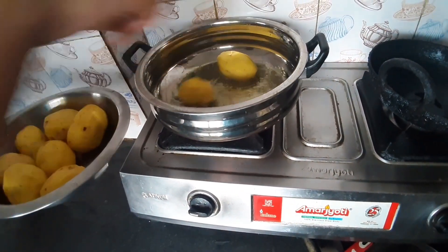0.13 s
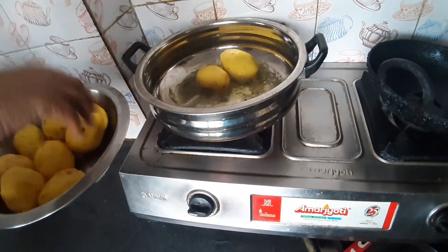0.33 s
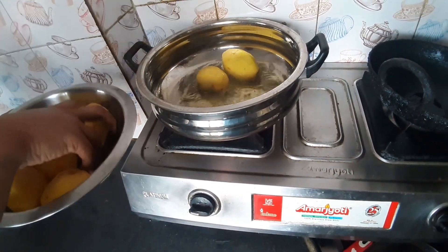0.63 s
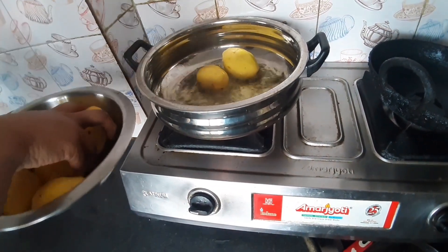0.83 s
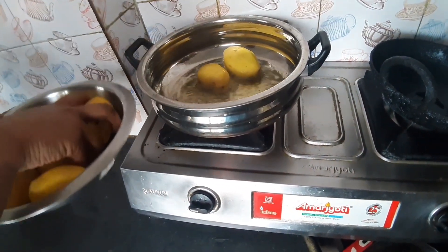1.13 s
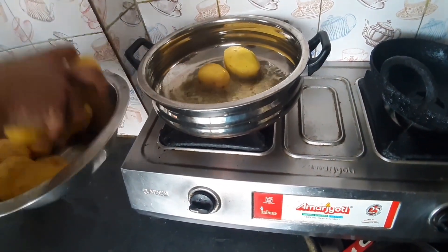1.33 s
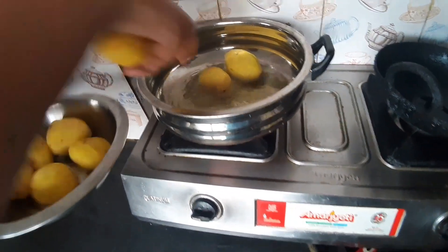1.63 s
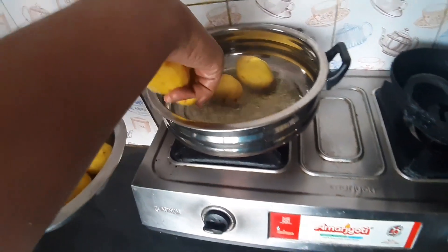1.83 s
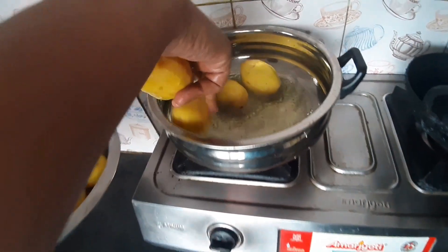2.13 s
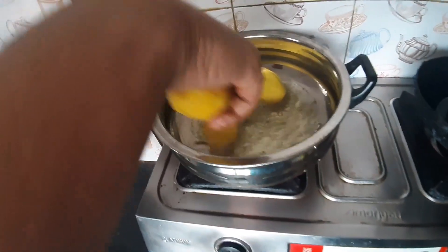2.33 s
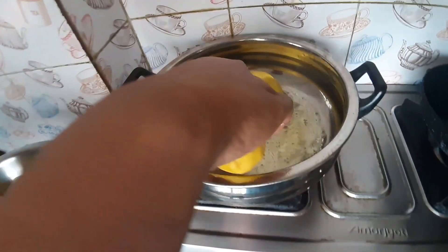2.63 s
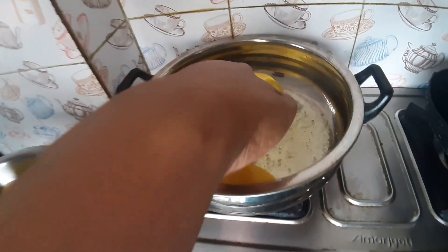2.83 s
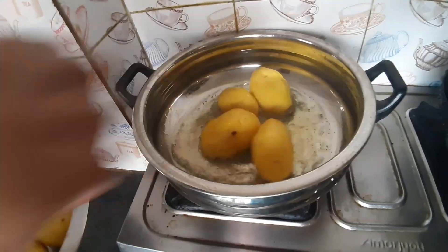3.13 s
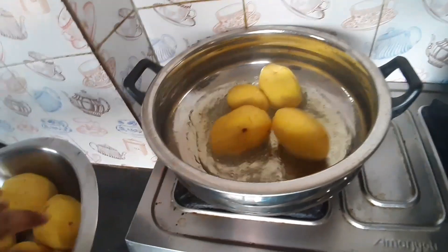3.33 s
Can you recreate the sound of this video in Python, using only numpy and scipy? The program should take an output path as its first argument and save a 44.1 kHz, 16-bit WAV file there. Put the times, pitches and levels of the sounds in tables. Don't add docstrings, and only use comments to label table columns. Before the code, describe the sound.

Potatoes frying in hot oil, close and in stereo. A wet one goes in at the start with a broad hissing surge and low gurgle, fading by about 0.4 s into crackle, hollow pops and glugs. Uneven sizzling flares near 1.5 s, stronger at 2.2 s and again at 2.9 s with deep bubbling. Sharp spits and thin bubble whistles ring the steel pan over faint flame and kitchen noise.

```python
import sys
import numpy as np
from scipy import signal
from scipy.fft import rfft, irfft
from scipy.io import wavfile

SR = 44100
rng = np.random.default_rng(int(sys.argv[2]) if len(sys.argv) > 2 else 0)


def gain_from_db(level_db):
    decades = np.asarray(level_db, float) / 20
    return 10 ** decades


def bounce(signal):
    frames = np.transpose(np.atleast_2d(signal))
    limited = np.clip(frames, -1, 1)
    pcm = np.round(limited * 32767).astype(np.int16)
    wavfile.write(sys.argv[1], SR, pcm)


N = 154350

# t/s, level/dB, tilt toward large bubbles/(dB/octave)
FRYING = [(0, -40, -2), (.13, -21.5, -26), (0.198, -20.5, 1), (.56, -25, 5.5), (.79, -30.5, 4),
          (0.899, -26, 1), (.97, -38, -3.5), (1.102, -27.5, 1), (1.31, -35.5, -1), (1.55, -23, 3.5),
          (1.9, -29, 3.5), (2.01, -31, -0.5), (2.15, -31, 1), (2.6, -23, -2), (2.822, -28.5, 2.5),
          (3.17, -23, 3.5), (3.33, -23.5, 4), (3.5, -31, 3.5)]


def rms_one(x):
    return x / np.sqrt(np.mean(x ** 2) + 1e-20)


def at_hz(points, hz):
    f, v = np.transpose(points)
    return np.interp(np.log(hz), np.log(f), v)


def drift(rate_hz):
    step = 40
    r = np.exp(-2 * np.pi * step * rate_hz / SR)
    slow = signal.lfilter([1], [1, -2 * r, r * r], rng.standard_normal(N // step + 2002))[2000:]
    return np.interp(np.arange(N) / step, np.arange(len(slow)), rms_one(slow))


def resonate(x, hz, width_hz):
    r = np.exp(-np.pi * width_hz / SR)
    zeros = np.array([1, 0, -1]) * (1 - r * r) / 2
    poles = [1, -2 * r * np.cos(2 * np.pi * hz / SR), r * r]
    return signal.lfilter(zeros, poles, x + 1e-18)


def filtered(x, order, hz, kind):
    return signal.sosfilt(signal.butter(order, hz, kind, fs=SR, output="sos"), x)


def grains(rate_per_s, spread_db, share):
    sizes = gain_from_db(spread_db * np.minimum(rng.exponential(1, (4, N)), 6)) * rng.choice([-1, 1], (4, N))
    hits = rms_one(sizes * (rng.random((4, N)) < rate_per_s / SR))
    mix = share * hits + (1 - share) * rng.standard_normal((4, N))
    return rms_one(mix).reshape(2, 2, N)


def banded(source, spectrum, shared_db, own_db, tilt_db=0):
    # f/Hz, likeness/(0-1)
    likeness = [(60, 0.96), (240, 1), (950, 0.44), (3770, 0), (15000, 0.05)]
    # f/Hz, left over right/dB
    lean = [(60, -4), (150, 1), (380, 0), (950, -1), (2380, -5.5), (5980, -2.5), (15000, 3)]
    pivot_hz = 5250
    out, power = 0, 0
    together = drift(33) + drift(66)
    lowest, highest = spectrum[0][0], spectrum[-1][0]
    edges = np.geomspace(lowest, highest, int(2.5 * np.log2(highest / lowest)) + 1)
    for k, (low, high) in enumerate(zip(edges, edges[1:])):
        mid, side = filtered(source[k % 2], 2, [low, high], "band")
        hz = np.sqrt(low * high)
        alike = np.clip(at_hz(likeness, hz), 0, 1)
        level_db = at_hz(spectrum, hz)
        power += gain_from_db(2 * level_db) * (high - low) * 2 / SR
        flicker_db = shared_db * together + own_db * drift(12.4)
        gain = gain_from_db(level_db + flicker_db + tilt_db * min(np.log2(hz / pivot_hz), 0))
        pair = np.sqrt(1 + alike) * mid + np.sqrt(1 - alike) * side * [[1], [-1]]
        out = out + gain * pair * gain_from_db(at_hz(lean, hz) / 2 * np.array([[1], [-1]]))
    return out / np.sqrt(power)


def lulls():
    breaths = [(0.973, .022, 1.5), (1.018, 0.012, 1.5), (1.091, 0.01, -6), (1.16, 0.007, -3.5),
               (1.23, 0.016, -1.5), (1.26, 0.023, -3), (1.296, .015, -16), (1.383, 0.011, -3),
               (1.427, 0.019, -2), (1.685, 0.0084, -5.5), (1.79, 0.011, -3.5), (0.138, 0.023, -4),
               (2.015, 0.017, -5), (2.063, 0.016, -6), (2.128, .01, -5), (2.145, 0.0096, -11),
               (2.384, 0.029, -4), (2.441, 0.028, -3), (2.518, 0.007, -1), (2.586, .028, -3.5),
               (2.64, 0.026, -2), (2.773, 0.015, -2), (3.09, 0.038, -1)]
    t = np.arange(0, N, 16) / SR
    gain_db = sum(db * np.exp(-((t - s) / half) ** 4) for s, half, db in breaths)
    return np.repeat(gain_from_db(gain_db), 16)[:N]


def ticks():
    snaps = [
        0.263,
        0.3328,
        0.475,
        0.605,
        1.5,
        1.696,
        2.441,
        3.048,
        3.289,
    ]
    ticks_per_s, spread_db, level_db = 400, 4, -7.5
    born = (rng.random(N) < ticks_per_s / SR) * rng.choice([-1, 1], N)
    spread = np.minimum(rng.exponential(1, N), 4)
    loudest = (np.array(snaps) * SR).astype(int)
    born[loudest], spread[loudest] = 1, 5.0
    sizes = gain_from_db(spread_db * spread + 2.5 * rng.standard_normal((2, N)))
    late = np.array([np.roll(born * sizes[0], 7), born * sizes[1]])
    return gain_from_db(level_db) * rms_one(filtered(late + 1e-18, 2, [2500, 14000], "band"))


def fizz():
    # f/Hz, density/(dB/Hz)
    colour = [(500, -16.5), (1200, -10), (1900, -4.5), (4000, 0.5), (7400, -1.5), (9500, -3), (18500, -13)]
    # f/Hz, width/Hz, level/dB
    pan = [(663, 13, -4.5), (1564, 19, -5), (1830, 30, -19), (1965, 145, -8.5), (2544, 200, -15.5),
           (2920, 33, -34), (4410, 29, -11.5), (5880, 12, -65)]
    hum_db, hum_swing_db = 13.0, 2.5
    s, level_db, size_db = np.transpose(FRYING)
    t = np.arange(N) / SR
    bubbles = grains(rate_per_s=9000, spread_db=2, share=0.79)
    raw = banded(bubbles, colour, shared_db=1.2, own_db=1.7, tilt_db=4.0 - np.interp(t, s, size_db))
    body = sum(gain_from_db(db + hum_db + hum_swing_db * drift(12.6)) * resonate(raw, hz, width_hz)
               for hz, width_hz, db in pan)
    return gain_from_db(np.interp(t, s, level_db) + 1.5) * lulls() * (raw + body + ticks())


def mist():
    level_db, follows = -33.5, 0.29
    s, frying_db, _ = np.transpose(FRYING)
    vigour_db = np.interp(np.arange(N) / SR, s, frying_db - frying_db.mean())
    hiss = filtered(rng.standard_normal((2, N)), 4, 9000, "high")
    return gain_from_db(level_db + follows * vigour_db + 1.5 * drift(8)) * np.sqrt(lulls()) * rms_one(hiss)


def room_and_flame():
    # f/Hz, density/(dB/Hz)
    colour = [(22, -34), (50, -20), (110, 0.5), (250, -4), (500, -5.5), (1000, -5.5), (2000, -3)]
    return gain_from_db(-50.5) * banded(rng.standard_normal((2, 2, N)), colour, shared_db=1.0, own_db=1.5)


def surges():
    # t/s, level/dB, hold/s, release/s, gurgle level/dB
    rushes = [(0.018, -28, 0.21, .08, -44.5), (0.56, -45, 0.033, 0.028, -42.5),
              (1.024, -60, 0.089, 0.045, -65), (1.098, -39, 0.12, 0.066, -60),
              (1.315, -37, 0.05, 0.057, -50), (1.453, -24.5, 0.061, 0.059, -46),
              (1.685, -31, 0.014, 0.042, -42.5), (1.867, -24.5, 0.025, 0.035, -59),
              (2.177, -31.5, 0.062, 0.036, -48), (2.21, -18.5, 0.088, 0.057, -32),
              (2.399, -33, 1.2, .1, -48.5), (2.683, -58, .12, .04, -50), (0.835, -32.5, 0.066, .02, -70),
              (2.851, -20.5, 0.07, .1, -31.5), (3.069, -21, 0.022, 0.034, -41.5)]
    # f/Hz, density/(dB/Hz)
    steam_colour = [(900, -17), (2000, 0), (4000, -4.5), (8000, 2), (12500, -2.5), (18500, -5)]
    # f/Hz, density/(dB/Hz)
    gurgle_colour = [(45, -15.5), (110, -9), (250, -0.5), (380, -4), (490, -10.5), (680, -5), (1400, -7.5)]
    attack_s, gurgle_lag_s = 0.023, .004
    t = np.arange(N) / SR
    steam, low = 1e-9, 1e-9
    for s, db, hold_s, release_s, gurgle_db in rushes:
        shape = np.clip((t - s) / attack_s, 0, 1) * np.exp(-np.maximum(t - s - hold_s, 0) / release_s)
        steam = steam + gain_from_db(db) * shape
        low = low + gain_from_db(gurgle_db) * np.roll(shape, int(gurgle_lag_s * SR))
    hiss = banded(grains(7000, 3.0, share=.6), steam_colour, shared_db=.8, own_db=1.3)
    gurgle = banded(grains(500, 1.25, share=0.55), gurgle_colour, shared_db=-0.5, own_db=4.0)
    return steam * lulls() * hiss + low * gurgle


def bursts(rows, width, t60_s, trim_db, thump_db, pan_db):
    tail_share, snap_s, thump_low_hz = .55, 0.014, 300
    out, n = np.zeros((2, N + SR)), SR // 4
    t = np.arange(n) / SR
    for s, db, hz in rows:
        lumps = np.repeat(rng.uniform(.15, 1, n // 160 + 1), 160)[:n]
        envelope = (tail_share * lumps + np.exp(-t / snap_s)) * gain_from_db(-60 * t / t60_s)
        puff = (rng.standard_normal((2, n)) + 600 / hz * rng.standard_normal(n)) * envelope
        tone = resonate(resonate(puff, hz, width * hz), hz, 1.13 * width * hz)
        dull = signal.lfilter([.2], [1, -.8], filtered(puff, 2, thump_low_hz, "high"))
        sound = tone / np.abs(tone).max(1, keepdims=True) + gain_from_db(thump_db) * dull / np.abs(dull).max()
        i = int(s * SR)
        out[:, i:i + n] += sound * gain_from_db(db + trim_db + 1 + pan_db / 2 * np.array([[1], [-1]]))
    return out[:, :N]


def spits():
    # t/s, peak/dB, f/Hz
    droplets = [(0.0283, -17, 5340), (0.0796, -11, 8500), (0.332, -13, 8050), (0.9966, -17, 7900),
                (1.046, -15.5, 6250), (1.105, -16, 7100), (1.2426, -17, 9100), (1.2865, -17.5, 7540),
                (1.4002, -19.5, 4000), (1.6935, -11.5, 7500), (1.1608, -18, 6000), (1.3284, -14.5, 7000),
                (.1111, -9.5, 8800), (.7133, -15.5, 7360), (2.029, -23, 5460), (2.054, -18, 7450),
                (2.7826, -16.5, 4100), (2.4409, -18, 6930), (2.0855, -19, 7450), (2.1305, -13.5, 7350),
                (2.1655, -14.5, 3920), (2.193, -17, 6140), (2.4707, -12, 8060), (2.5233, -15, 7700),
                (2.6105, -7.5, 7400), (2.708, -12, 4510), (2.9938, -14, 4870), (3.078, -11, 5880)]
    return bursts(droplets, width=.3, t60_s=.07, trim_db=-1, thump_db=-41, pan_db=-6)


def glugs():
    # t/s, peak/dB, f/Hz
    gulps = [(.05, -32, 607), (.14, -35, 243), (.56, -15, 920), (.665, -24, 800), (1.33, -28, 705),
             (1.445, -22.5, 615), (1.693, -25, 654), (1.83, -21, 710), (1.41, -31.5, 776),
             (1.99, -29.5, 1100), (2.225, -22.5, 600), (2.875, -27, 577), (2.94, -26, 575),
             (2.088, -28.5, 806), (2.16, -26.5, 1110), (2.72, -38, 910), (2.84, -21.5, 1090),
             (3.1, -32.5, 557)]
    return bursts(gulps, width=1.3, t60_s=.3, trim_db=0, thump_db=-9, pan_db=-2.5)


def blubs():
    # t/s, peak/dB, f/Hz
    bubbles = [(.05, -37, 257), (.05, -28, 625), (.09, -29, 614), (.133, -27, 250), (.14, -33, 610),
               (.175, -30.5, 251), (.225, -39.5, 246), (2.225, -25, 300), (2.26, -26.5, 233),
               (2.7, -35, 176), (2.875, -28, 258), (2.875, -19, 650), (2.875, -20, 390), (2.91, -18.5, 235),
               (2.925, -20, 740), (2.94, -27, 240), (2.96, -19.5, 605), (3.015, -27, 265), (3.09, -25, 273),
               (3.095, -21, 596), (3.13, -32, 180)]
    return bursts(bubbles, width=0.19, t60_s=0.43, trim_db=-2.5, thump_db=-36, pan_db=0)


def pops():
    # t/s, peak/dB, f/Hz
    pockets = [(0.271, -13.5, 2500), (0.4733, -14.5, 1890), (0.5171, -17, 1890), (0.5566, -14, 2300),
               (0.6128, -14.5, 1970), (0.6687, -20.5, 1155), (0.7167, -13.5, 1950), (0.8664, -16, 2620),
               (1.1609, -13.5, 2740), (1.3254, -11.5, 1840), (1.3326, -10.5, 1516), (1.3521, -17, 1550),
               (1.4448, -20, 1950), (1.693, -20, 1830), (1.7344, -19, 1770), (1.8015, -14, 2680),
               (1.8283, -15.5, 2560), (1.8921, -13, 2330), (1.9917, -27.5, 1800), (2.0862, -9, 1780),
               (2.1593, -13.5, 1790), (2.6691, -17, 1910), (2.7018, -16.5, 1920), (2.8416, -21, 1860),
               (3.0163, -18, 2790), (3.091, -16.5, 2760), (3.2266, -21, 2740), (3.2571, -15, 1930),
               (3.3242, -10, 2220)]
    return bursts(pockets, width=0.19, t60_s=0.31, trim_db=-1.5, thump_db=-55, pan_db=-6)


def whistles():
    # t/s, peak/dB, f/Hz
    streams = [(1.027, -25, 6100), (1.05, -26, 6250), (1.065, -23, 5440), (1.075, -23.5, 4420),
               (1.192, -27, 4400), (1.955, -19, 3810), (.6, -21, 1544), (.73, -19, 1940), (.85, -24, 1550),
               (1.4, -21.5, 4290), (.3, -23, 1525), (1.745, -21, 1805), (3.2, -19.5, 2020),
               (3.39, -21.5, 2034), (3.44, -17, 2660), (3.48, -19.5, 2040), (2.04, -23, 5400),
               (2.61, -13, 6940), (2.615, -15, 8100)]
    return bursts(streams, width=0.051, t60_s=0.21, trim_db=-1.5, thump_db=-46, pan_db=-6)


def scene():
    steady = fizz() + mist() + room_and_flame()
    return steady + surges() + spits() + glugs() + blubs() + pops() + whistles()


def low_pass(x):
    return signal.sosfilt(signal.butter(12, 16020, fs=SR, output="sos"), x)


def record(dry):
    # f/Hz, gain/dB
    mic = [(8800, 0.5), (9400, -7), (11500, -2.5)]
    x = irfft(rfft(dry) * gain_from_db(at_hz(mic, np.fft.rfftfreq(N, 1 / SR) + 1)), N)
    rounded = .97 * np.tanh(x / .97)
    mix = signal.sosfilt(signal.cheby2(16, 70, 16250, fs=SR, output="sos"), rounded)
    return low_pass(mix)


dry = scene()
out = record(dry)
bounce(out)
```